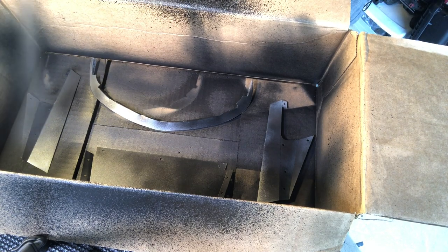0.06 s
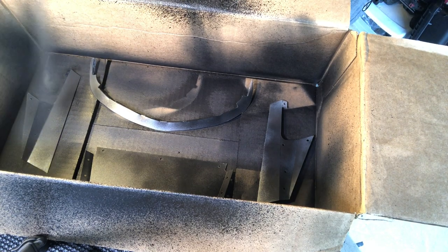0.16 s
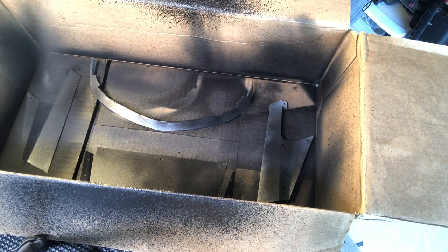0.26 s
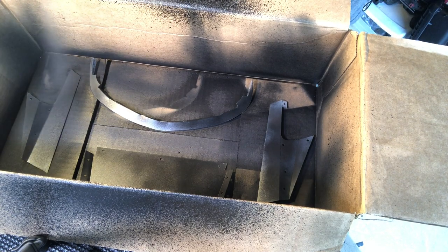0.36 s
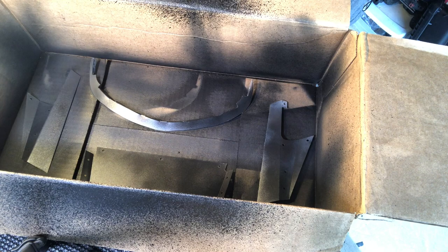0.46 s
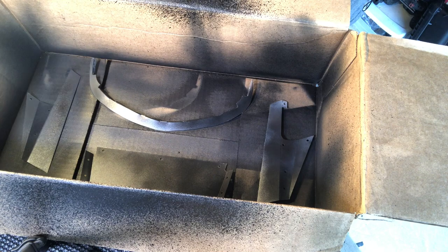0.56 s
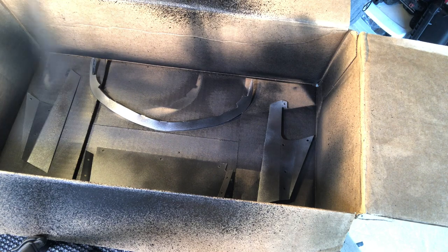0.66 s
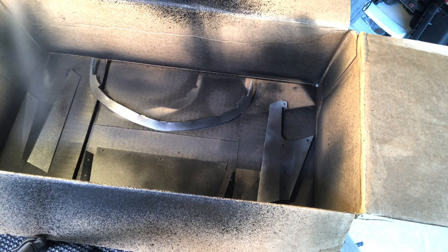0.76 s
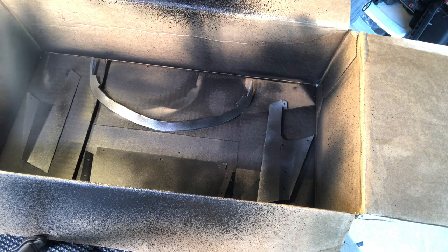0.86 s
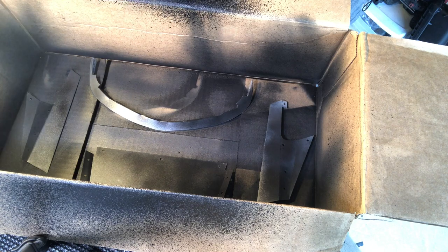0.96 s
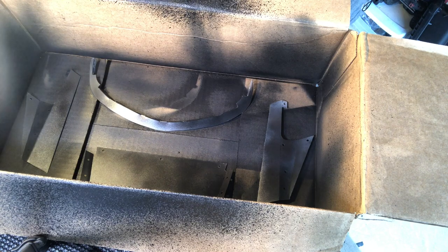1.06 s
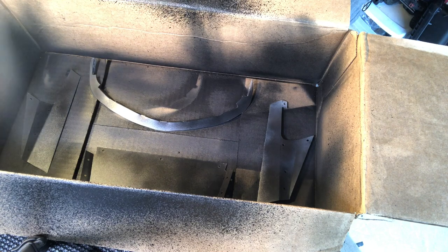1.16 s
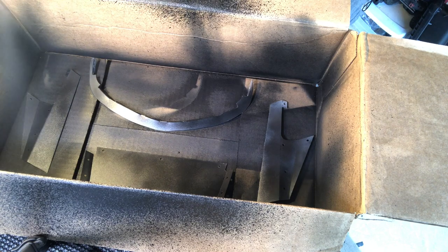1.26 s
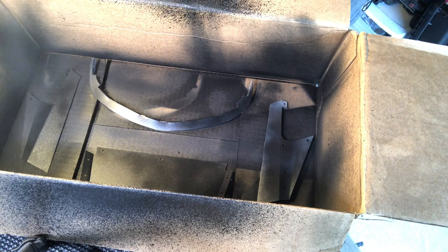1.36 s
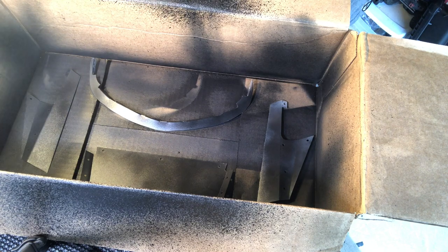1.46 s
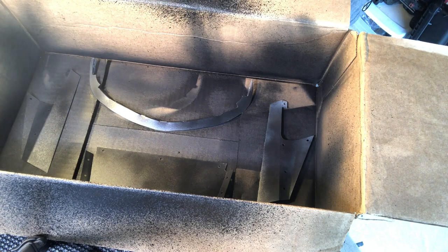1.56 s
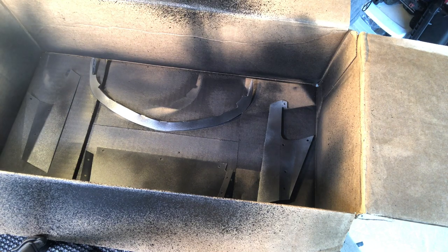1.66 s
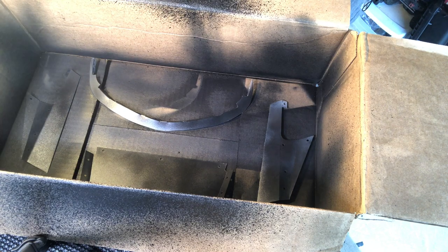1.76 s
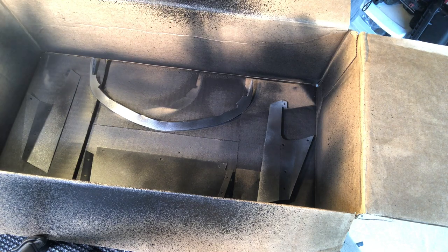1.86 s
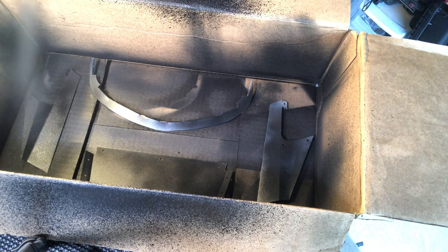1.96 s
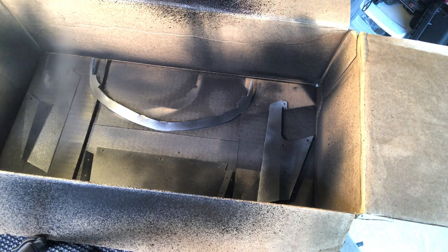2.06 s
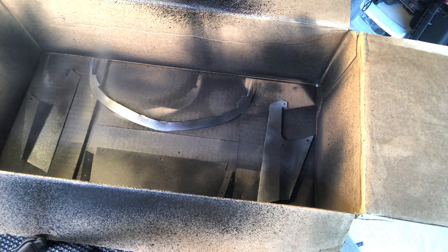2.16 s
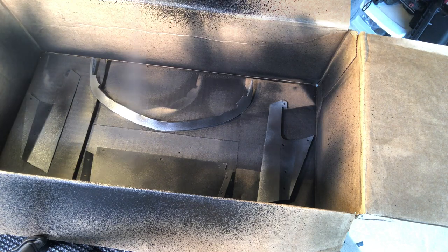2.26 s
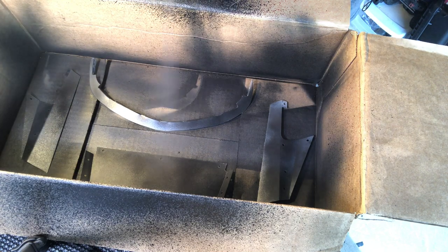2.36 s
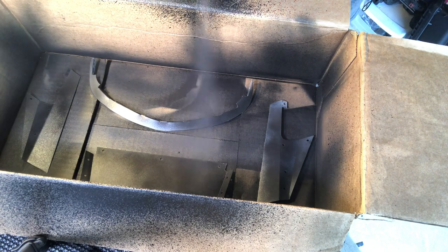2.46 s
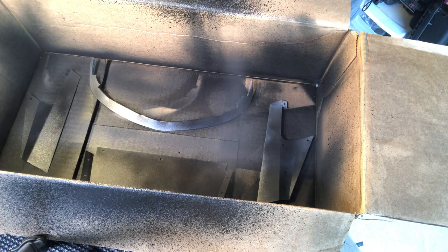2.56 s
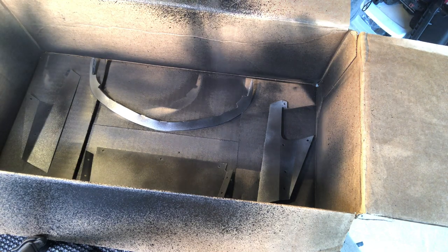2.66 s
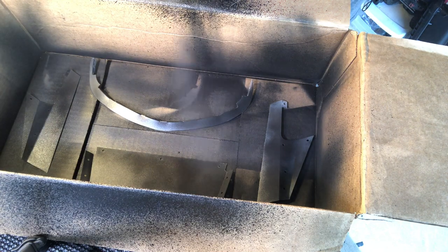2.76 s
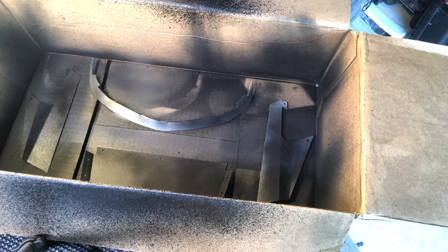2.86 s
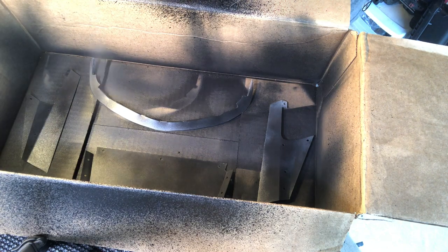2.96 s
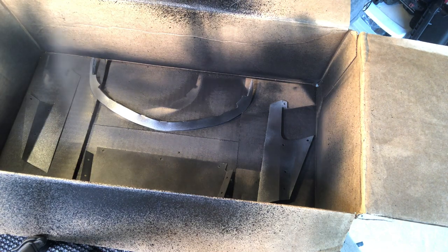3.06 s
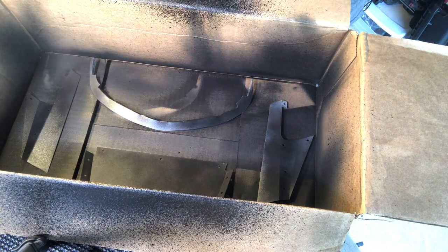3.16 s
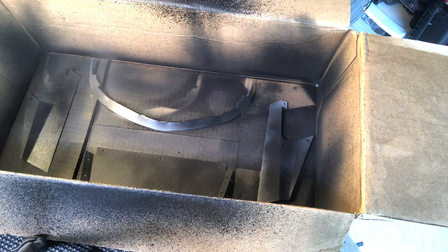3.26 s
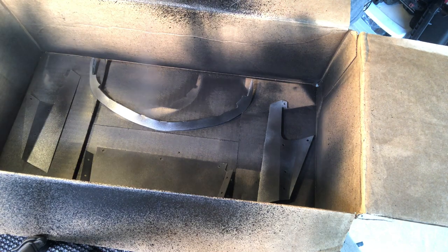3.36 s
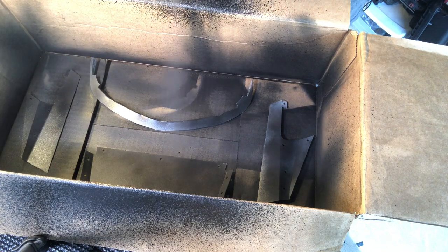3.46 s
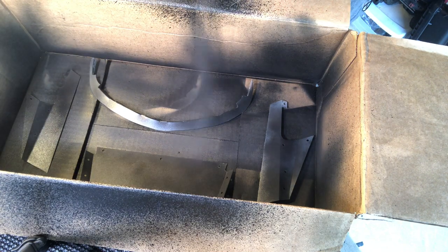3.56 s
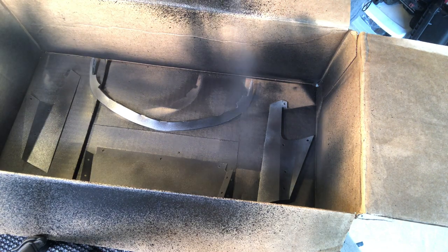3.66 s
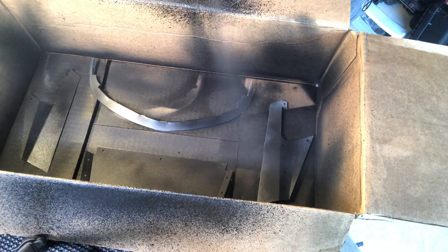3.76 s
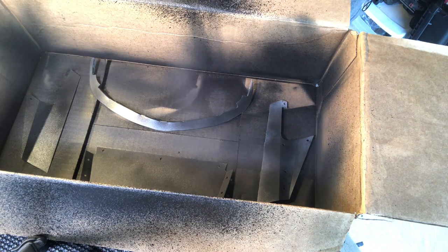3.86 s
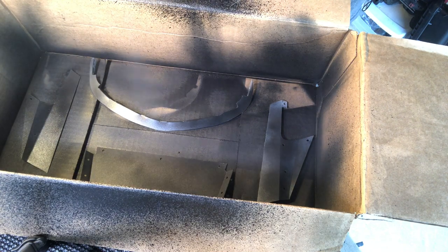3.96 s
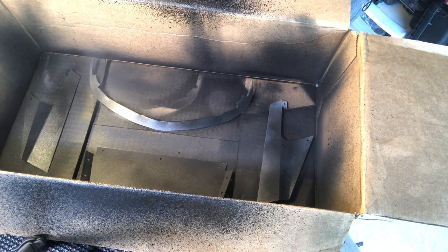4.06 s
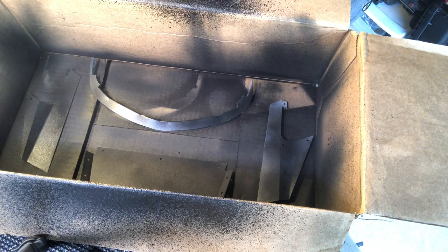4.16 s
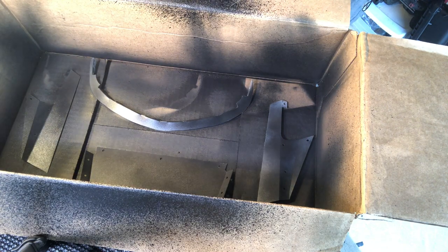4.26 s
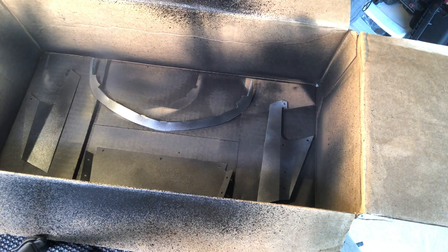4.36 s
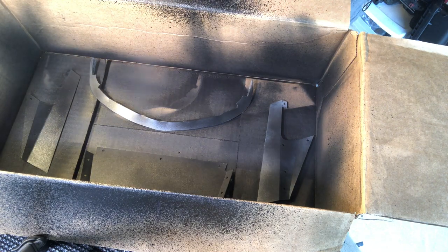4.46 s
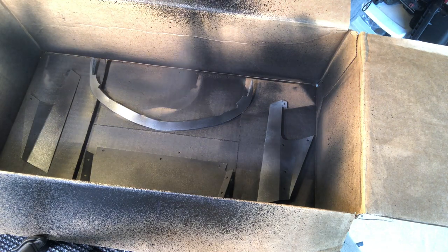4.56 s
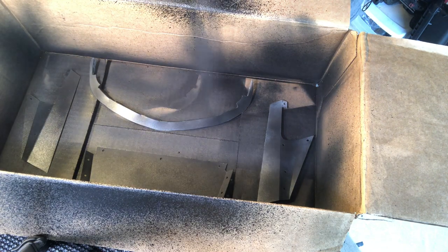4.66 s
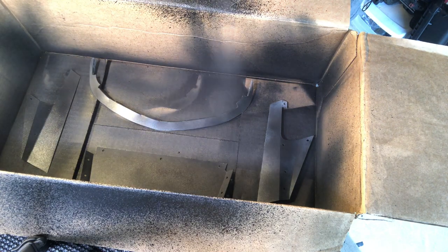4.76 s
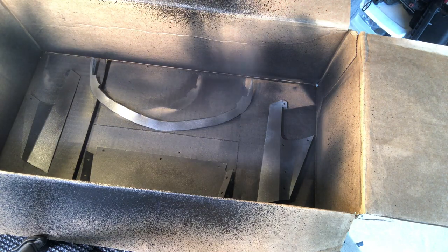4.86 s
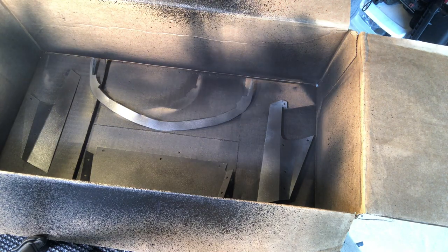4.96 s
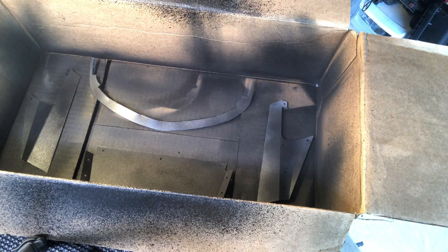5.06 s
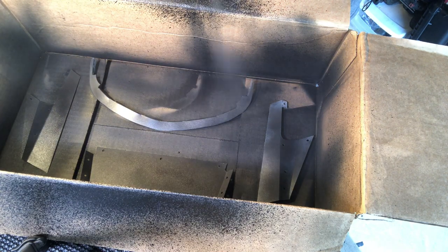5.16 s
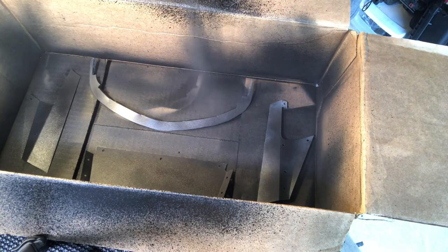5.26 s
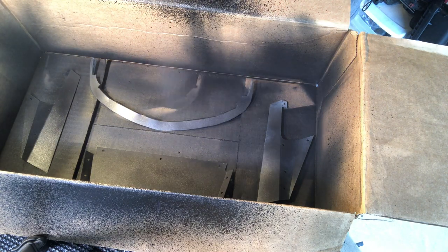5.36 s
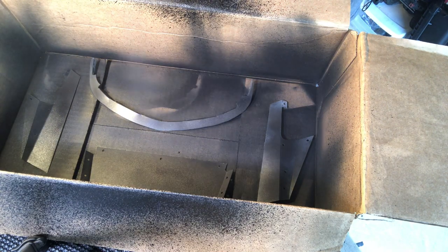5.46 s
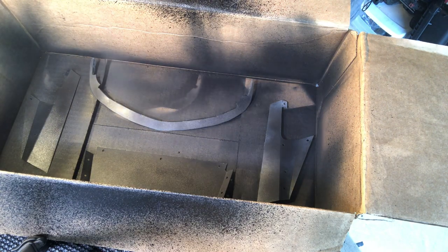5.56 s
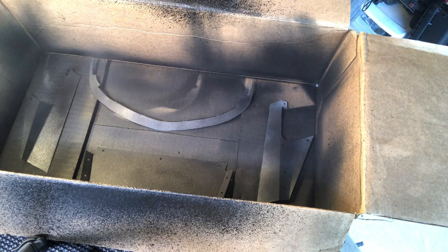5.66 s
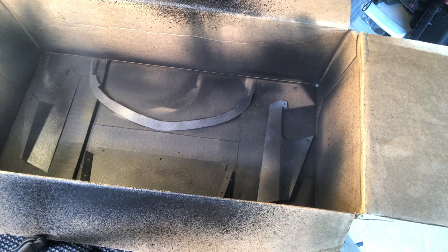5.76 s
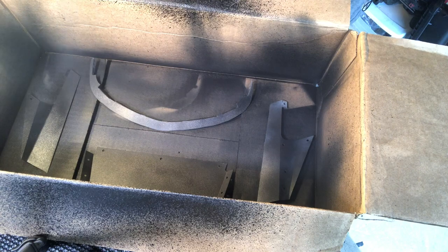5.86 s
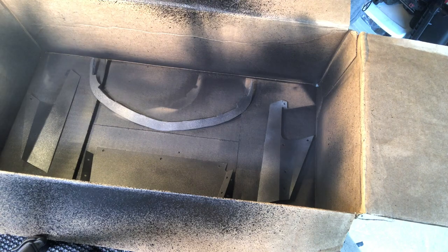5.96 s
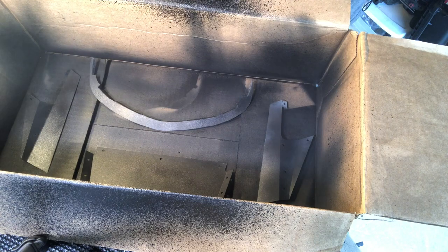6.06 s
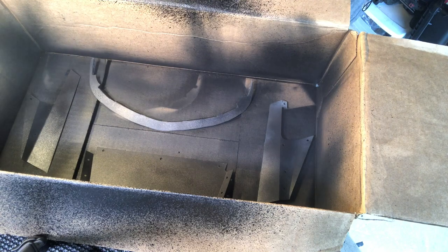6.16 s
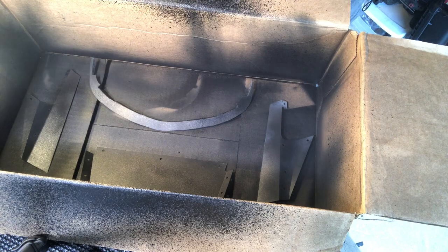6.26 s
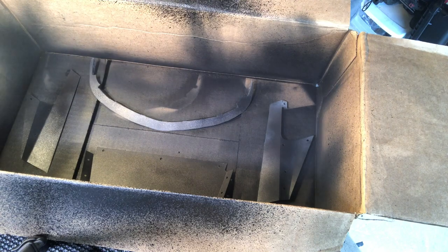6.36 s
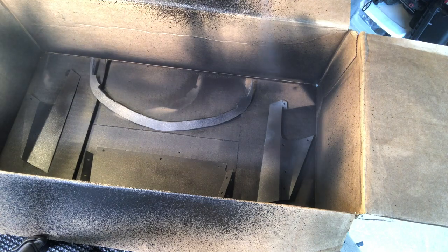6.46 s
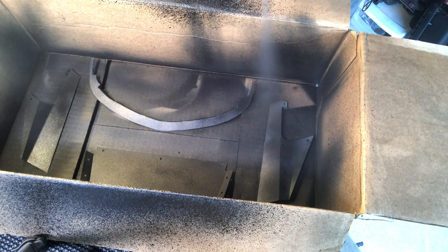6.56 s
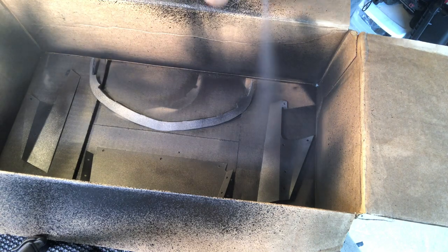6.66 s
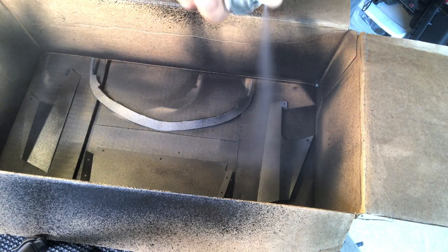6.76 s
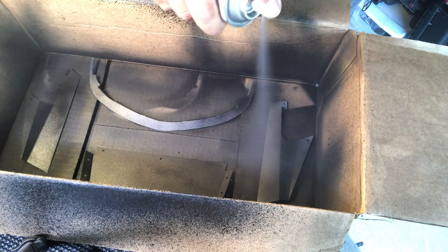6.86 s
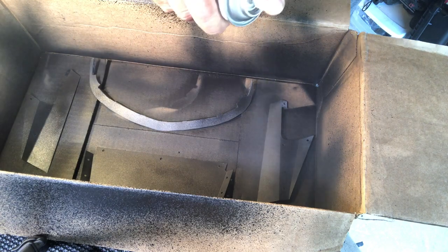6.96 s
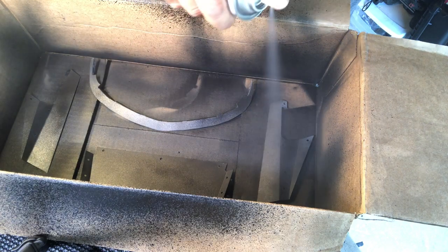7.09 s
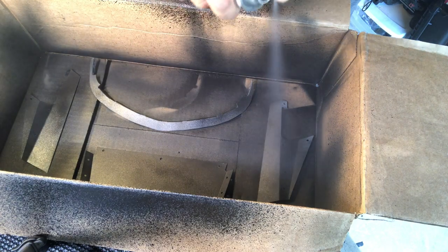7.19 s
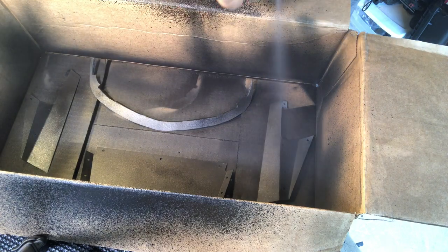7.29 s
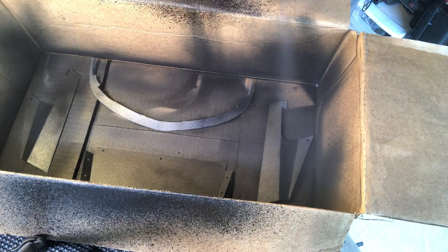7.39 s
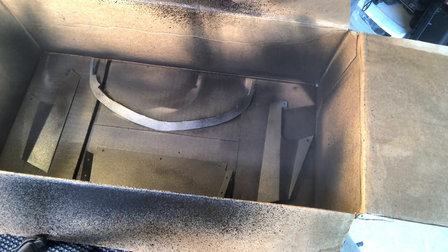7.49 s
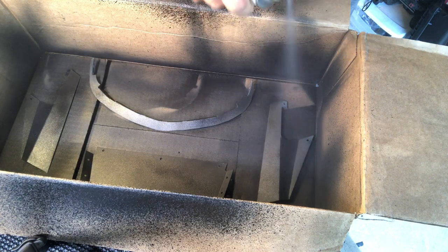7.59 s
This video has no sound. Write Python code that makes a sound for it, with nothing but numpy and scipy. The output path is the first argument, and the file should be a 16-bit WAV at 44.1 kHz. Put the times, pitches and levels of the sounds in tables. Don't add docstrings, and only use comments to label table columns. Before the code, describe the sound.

A spray paint can hisses in short, bright bursts close by inside a cardboard box, with valve ticks, ball knocks and faint distant birds.

```python
import sys
import numpy as np
from scipy import signal
from scipy.io import wavfile
from scipy.ndimage import uniform_filter1d

SR = 44100
rng = np.random.default_rng(int(sys.argv[2]) if len(sys.argv) > 2 else 0)


def magnitude_from_level(level_db):
    exponent = np.asarray(level_db, float) / 20
    return 10 ** exponent


def store_wav(level_fs):
    pcm = np.round(np.clip(np.atleast_2d(level_fs), -1, 1) * 32767)
    wavfile.write(sys.argv[1], SR, pcm.T.astype(np.int16))


N = 336483


def evened(x):
    return x / np.sqrt(np.mean(x ** 2) + 1e-20)


def read(points, hz):
    f, value = np.transpose(points)
    return np.interp(np.log(hz + 1), np.log(f + 1), value)


def add(mix, s, sound):
    part = mix[round(s * SR):][:len(sound)]
    part += sound[:len(part)]


def resonate(x, hz, width):
    turn = np.exp(2j * np.pi * np.cumsum(hz * np.ones(len(x))) / SR)
    r = np.exp(-np.pi * width / SR)
    return 2 * (turn * signal.lfilter([1 - r], [1, -r], x / turn)).real


def wobble(ms):
    span = max(int(ms * SR / 1000), 2)
    smooth = uniform_filter1d(rng.standard_normal(N), span)
    return evened(uniform_filter1d(smooth, span))


def drifting_patches(shape, bins, frames):
    across_pitch = uniform_filter1d(rng.standard_normal(shape), bins, axis=0)
    return evened(uniform_filter1d(across_pitch, frames, axis=1))


def tail(x, t60, dull_hz):
    t = np.arange(SR // 2) / SR
    dulling = np.exp(-2 * np.pi * dull_hz / SR)
    taps = signal.lfilter([1], [1, -dulling], rng.standard_normal(len(t)))
    taps *= magnitude_from_level(-60 * t / t60) * (t > .003)
    return signal.fftconvolve(x, taps / np.linalg.norm(taps))[:N]


# pitch in Hz, level in dB per Hz.
AIR_COLOUR = [(15, -49), (25, 0.5), (211, -6), (622, -8), (712, -9.5), (815, -14), (1100, -11), (3700, -22),
              (4350, -24), (5400, -23), (6520, -29), (7670, -24), (9260, -33), (13200, -30), (15900, -32)]
# pitch in Hz, width in Hz, level in dB.
HUM_LINES = [(120.7, 16, -68.5), (270.8, 30, -70.5), (67, 20, -69)]
# time in seconds, change in level in dB.
TRAFFIC_SWELL = [
    (0, -0.5),
    (1.0, -1.5),
    (1.8, -3),
    (2.5, -2),
    (3.5, 4.5),
    (4.5, 0),
    (5.5, -0.3),
    (6.5, 1.2),
    (7.63, -1),
]


def air():
    hz, t, z = signal.stft(rng.standard_normal(N), SR, nperseg=2048)
    patches_db = 2.9 * drifting_patches(z.shape, 8, 6)
    s, db = np.transpose(TRAFFIC_SWELL)
    swell_db = np.outer(1 / (1 + (hz / 500) ** 4), np.interp(t, s, db))
    colour_db = read(AIR_COLOUR, hz)[:, None] + patches_db + swell_db
    wash = signal.istft(z * magnitude_from_level(colour_db), SR, nperseg=2048)[1][:N]
    hum = sum(magnitude_from_level(db) * evened(resonate(rng.standard_normal(N), f, w)) for f, w, db in HUM_LINES)
    return magnitude_from_level(-64.5) * evened(wash) + hum


# start pitch in Hz, end pitch in Hz, share of the length spent rising.
WHISTLE_KINDS = [
    (1705, 2270, .98),
    (2945, 3455, .42),
    (2300, 3215, .52),
    (1840, 2250, .69),
]
# start in seconds, length in seconds, level in dB.
WHISTLE_NOTES = [
    [(.446, 0.064, -56.5), (.88, .075, -58), (1.524, .07, -59.5)],
    [(.531, 0.047, -53.5), (.95, 0.035, -55), (1.391, 0.054, -58), (1.607, 0.047, -57.5)],
    [(4.996, 0.04, -62), (5.971, 0.033, -52), (6.113, 0.029, -53), (6.255, 0.031, -50.5), (6.4, 0.021, -50)],
    [(6.078, .024, -59), (6.222, 0.024, -59), (6.365, .025, -61)],
]
# time in seconds, pitch in Hz, level in dB.
HOARSE_CALLS = [
    [(3.105, 1660, -68), (3.14, 1640, -60), (3.18, 1640, -70)],
    [(6.09, 1590, -69), (6.14, 1600, -72), (6.18, 1610, -67), (6.23, 1600, -71), (6.28, 1620, -67),
     (6.37, 1605, -68), (6.44, 1585, -68)],
]


def whistle(from_hz, to_hz, rise, length, db):
    u = np.linspace(0, 1, int(length * SR))
    reached = np.minimum(u / rise, 1) ** 0.99
    hz = from_hz + (to_hz - from_hz) * reached
    hz *= 1 + 0.015 * np.sin(2 * np.pi * 45 * u * length)
    loudness = magnitude_from_level(db - 3.9 * (2.5 - rise) * (1.5 - reached)) * np.hanning(len(u)) ** 0.094
    return loudness * np.sin(2 * np.pi * np.cumsum(hz) / SR)


def hoarse_call(s, hz, db):
    t = np.arange(s[0], s[-1], 1 / SR)
    pitch = np.interp(t, s, hz)
    tone = np.sqrt(2) * np.sin(2 * np.pi * np.cumsum(pitch) / SR)
    breath = resonate(resonate(rng.standard_normal(len(t)), pitch, 110), pitch, 110)
    fuzzy = evened(tone + 0.92 * evened(breath))
    return magnitude_from_level(np.interp(t, s, db)) * fuzzy * signal.windows.tukey(len(t), .2)


def birds():
    out = np.zeros(N)
    for kind, notes in zip(WHISTLE_KINDS, WHISTLE_NOTES):
        for s, length, db in notes:
            add(out, s, whistle(*kind, length, db))
    for rows in HOARSE_CALLS:
        s, hz, db = np.transpose(rows)
        add(out, s[0], hoarse_call(s, hz, db))
    return magnitude_from_level(-1.0) * out + magnitude_from_level(-1.0) * tail(out, 0.51, 6000)


# start in seconds, peak level in dB, ring pitch in Hz.
BALL_KNOCKS = [(0.2717, -48, 1330), (0.63, -48, 1410), (0.7547, -43, 1820), (0.8368, -43, 1210),
               (1.228, -44, 1340), (2.0246, -43, 1185), (3.7552, -55, 1700), (4.572, -44, 1210),
               (4.911, -45, 1270), (4.954, -50, 1200), (5.102, -44, 1355), (5.235, -46, 1210),
               (5.277, -43, 1384), (6.437, -44, 1386), (6.5234, -47, 1310), (7.3486, -42, 1440),
               (7.5606, -47, 1250)]


def knocks():
    out, t = np.zeros(N), np.arange(2000) / SR
    for s, db, hz in BALL_KNOCKS:
        wall = np.sin(2 * np.pi * hz * t) + 0.58 * np.sin(2 * np.pi * 1.32 * hz * t)
        add(out, s, magnitude_from_level(db - 0.5 - 60 * t / 0.056) * wall * np.minimum(t / 0.00071, 1))
    return out


# start in seconds, peak level in dB, ring pitch in Hz,
# treble against the ring in dB.
VALVE_TICKS = [(0.572, -40, 2040, -10), (1.3814, -49, 4100, -4), (1.3974, -54, 3250, 0),
               (1.4234, -38, 2080, -7), (1.49, -55, 1510, -11), (1.721, -45.5, 2190, -12),
               (1.811, -44.5, 2250, -24), (1.827, -52, 2300, -15), (2.5996, -54, 1820, -4),
               (4.9916, -46, 4180, -2), (5.9454, -46, 1250, -9), (6.043, -58, 11500, -6),
               (6.076, -63, 11500, -6), (6.2087, -61, 11000, -6), (7.4894, -54, 3200, -13),
               (7.509, -48, 3180, -14)]


def ticks():
    out, t = np.zeros(N), np.arange(1300) / SR
    for s, db, hz, treble_db in VALVE_TICKS:
        noise = rng.standard_normal(len(t))
        ring = evened(resonate(noise, hz, 3000)) * magnitude_from_level(-60 * t / 0.035)
        crack = np.diff(noise, prepend=0) * magnitude_from_level(treble_db - 11 - 60 * t / .02)
        add(out, s, magnitude_from_level(db - 6.5) * (ring + crack))
    return out


# start in seconds, peak level in dB, pitch in Hz.
CARDBOARD_GUSTS = [(0.632, -50, 680), (1.046, -50, 600), (1.939, -55, 455), (2.674, -52, 406),
                   (3.18, -53, 690), (4.317, -50.5, 367), (5.104, -62, 668), (5.234, -55, 657),
                   (6.439, -59, 789), (7.066, -54, 650), (7.565, -53, 686)]


def gusts():
    out, t = np.zeros(N), np.arange(3000) / SR
    for s, db, hz in CARDBOARD_GUSTS:
        noise = rng.standard_normal(len(t))
        thud = evened(resonate(resonate(noise, hz, 610), hz, 610))
        add(out, s, magnitude_from_level(db + 1 - 60 * t / 0.081) * thud * np.minimum(t / 0.0018, 1))
    return out


# start in seconds, level in dB, lower part against it in dB.
GAS_SPITS = [
    (0.614, -52.5, 2),
    (1.009, -53, -3),
    (1.927, -54.5, 4.5),
    (2.658, -51, -13),
    (3.143, -63, -2),
    (4.292, -51.5, -2.5),
    (5.081, -51, -3),
    (6.425, -54, 3),
    (7.044, -59, 2),
    (7.549, -51, -5),
]


def spits():
    out, t = np.zeros(N), np.arange(1500) / SR
    for s, db, low_db in GAS_SPITS:
        noise = rng.standard_normal(len(t))
        puff = evened(resonate(noise, 16600, 4100)) + magnitude_from_level(low_db) * evened(resonate(noise, 5200, 2700))
        add(out, s, magnitude_from_level(db + 5.5 - 60 * t / 0.056) * puff * np.minimum(t / 0.0013, 1))
    return out


# paint arrives in seconds, finger lets go in seconds.
SQUEEZE_TIMES = [(-.2, .41), (.624, .856), (1.015, 1.355), (1.93, 2.553), (2.663, 3.092), (3.158, 4.146),
                 (4.296, 4.937), (5.089, 5.908), (6.428, 6.94), (7.053, 7.415), (7.553, 7.7)]


def through_squeezes(t, rows):
    times = [np.linspace(opens, shuts, len(row)) for (opens, shuts), row in zip(SQUEEZE_TIMES, rows)]
    return np.interp(t, np.concatenate(times), np.concatenate(rows))


# rise in seconds, release in seconds, jet at first in dB,
# jet at last in dB, paint landing in the box in dB.
SQUEEZE_STROKES = [(.02, 0.057, -44, -44, -52), (0.011, .05, -45, -44.5, -51.5),
                   (0.0085, 0.035, -43.5, -44, -50.5), (0.0079, 0.03, -42.5, -44.5, -49),
                   (0.0082, 0.03, -44, -44, -49), (0.014, 0.037, -44, -44.5, -50),
                   (.012, 0.048, -42.5, -46, -51.5), (0.013, 0.028, -45, -44, -51),
                   (0.011, 0.04, -47.5, -45.5, -50), (.015, 0.054, -45, -47.5, -49),
                   (0.0084, .04, -48.5, -45, -50)]
# time in seconds, level against the open flow in dB.
VALVE_HICCUPS = [
    (1.401, -21),
    (1.428, -16.5),
    (2.603, -18),
    (3.147, -24),
    (4.191, -17),
    (4.994, -19),
    (5.948, -23),
    (6.996, -21),
]


def flow(t, lag, surge_db, fall_db, leak_db, hiccup_db):
    rise_bend, shut_bend, surge_s = 0.82, 1.35, 0.013
    hiccup_fade, leak_fade = 1500, 140
    out = sum(magnitude_from_level(db + hiccup_db - hiccup_fade * abs(t - s)) for s, db in VALVE_HICCUPS)
    for (opens, shuts), (rise, release, *_) in zip(SQUEEZE_TIMES, SQUEEZE_STROKES):
        since = np.maximum(t - opens - lag, 0)
        after = np.maximum(t - shuts, 0)
        surge = magnitude_from_level(surge_db * np.exp(-since / surge_s))
        opening = (1 - np.exp(-(since / rise) ** rise_bend)) * surge
        closing = magnitude_from_level(-fall_db * np.minimum(after / release, 10) ** shut_bend)
        leak = magnitude_from_level(leak_db - leak_fade * np.maximum(after - release, 0)) * np.minimum(after / release, 1)
        out = out + opening * (closing + leak)
    return out


# pitch in Hz, share from 0 to 1.
WALL_SHARE = [(800, 0.11), (3000, 0.17), (7000, 0.2), (10000, 0.71), (13000, 0.62), (16000, 0.35)]
# extra path by the near wall in ms, at even steps.
HAND_SWEEPS = [(1.44, 1.346, 1.24, 1.196), (1.21, 1.268, 1.365), (1.352, 1.277, 1.236),
               (1.398, 1.412, 1.46, 1.52, 1.59), (1.555, 1.481, 1.411, 1.383),
               (1.41, 1.412, 1.472, 1.54, 1.506, 1.452, 1.437), (1.444, 1.451, 1.469, 1.484),
               (1.486, 1.469, 1.429, 1.386, 1.369), (1.43, 1.427, 1.482, 1.559),
               (1.705, 1.612, 1.531, 1.49), (1.337, 1.322)]


def wall_echo(hz, t):
    near = through_squeezes(t, HAND_SWEEPS)

    def late(ms):
        return np.exp(-2j * np.pi * np.outer(hz, ms) / 1000)

    face = late(near) + 0.49 * late(near + 0.266) + 0.1 * late(near - .3) + 0.16 * late(2.1 * near - .9)
    corner_share = .3 / (1 + (hz / 7000) ** 6)
    return read(WALL_SHARE, hz)[:, None] * face + corner_share[:, None] * late(near + .22)


# pitch in Hz, level in dB per Hz.
HISS_COLOUR = [(180, -51.5), (300, -25.5), (502, -23), (583, -21), (854, -21.5), (1210, -12), (1480, -15),
               (1800, -12.5), (3120, -10), (3390, -7.5), (6270, -10.5), (7660, -6.5), (9190, -6.5),
               (13200, 15), (15900, -1)]
# pitch in Hz, width in Hz, boost in dB.
BOX_MODES = [(1068, 45, 12), (1210, 64, 0.5), (570, 68, 8.5), (2850, 150, 0.5), (4020, 360, 1.5),
             (4690, 1100, 2), (7850, 1400, 3), (9100, 290, -1.5), (12300, 2500, 0.5), (14640, 700, 6.5)]
# fizz tilt at first in dB, fizz tilt at last in dB,
# jet tilt at first in dB, jet tilt at last in dB.
NOZZLE_AIM = [(-2.5, 2.5, 1.5, -1.5), (0, -1.5, 4.5, -0.5), (-2, -1, 3.5, 2), (-2.5, -2.2, 2.5, -0.5),
              (-3, 0, -1.5, 3), (-0.4, -1.3, -0.2, -0.1), (-1, -1.7, 0.2, 0.1), (-2, -0.5, 0, 0),
              (1.5, 2.5, 1.5, -1.5), (1.5, 5, -1, 2), (5, 8, 2, -3.5)]


def spray_colour(hz, t, shape):
    fizz_db, jet_db = (through_squeezes(t, half) for half in np.hsplit(np.array(NOZZLE_AIM), 2))
    tilt_db = np.outer(np.clip((hz - 12800) / 2500, -1, 1) * (hz > 9300), fizz_db)
    tilt_db += np.outer(np.sin(np.pi * np.clip((hz - 4100) / 2000, -1, 1)), jet_db)
    box_db = sum(db / (1 + (2 * (hz - f) / w) ** 2) for f, w, db in BOX_MODES)
    patches = drifting_patches(shape, 8, 30)
    colour_db = (read(HISS_COLOUR, hz) + box_db)[:, None] + tilt_db + 1.53 * patches
    wall_patches = magnitude_from_level(2.5 * (patches[::-1] - 1))
    return magnitude_from_level(colour_db) * (1 + wall_patches * wall_echo(hz, t))


# level in dB, at even steps.
FIZZ_LEVELS = [(-36, -36, -37, -35), (-37, -36, -39), (-39, -40, -37), (-41, -38, -37.5, -38, -35.5),
               (-37.5, -37.5, -36.5, -36.5), (-36, -37, -36, -36.5, -36, -35.5, -38.5),
               (-36.5, -38, -37, -39), (-37.5, -39, -36.5, -37.5, -37.5), (-40, -37, -34.5, -37.5),
               (-36.5, -37, -36.5, -36.5), (-34.5, -42)]
# lag in seconds, first surge in dB, fall over the release in dB,
# leak after it in dB, share of the fizz swings from 0 to 1.
SPRAY_LAYERS = [
    (0, -4, 32, -32, 1),
    (0.001, 3.5, 24, -24, .25),
    (.006, 7, 25, -17, .2),
]


def spray():
    splutter = magnitude_from_level(0.97 * wobble(0.42) + 0.63 * wobble(3.3) + 0.27 * wobble(30))
    hz, t, z = signal.stft(rng.standard_normal(N) * splutter, SR, nperseg=512, noverlap=384)
    colour = spray_colour(hz, t, z.shape)
    above_box = 1 / (1 + (3600 / (hz + 1)) ** 6)
    above_jet = 1 / (1 + (9300 / (hz + 1)) ** 12)
    shares = [above_jet, above_box - above_jet, 1 - above_box]

    clock, out = np.arange(N) / SR, np.zeros(N)
    usual_fizz_db = -36
    swing_db = through_squeezes(clock, FIZZ_LEVELS) - usual_fizz_db
    jet_db = through_squeezes(clock, [row[2:4] for row in SQUEEZE_STROKES])
    paint_db = through_squeezes(clock, [row[4:] * 2 for row in SQUEEZE_STROKES])
    levels_db = [usual_fizz_db, jet_db, paint_db]
    hiccups_db = [0, 4, 4]
    for share, level_db, hiccup_db, layer in zip(shares, levels_db, hiccups_db, SPRAY_LAYERS):
        lag, surge_db, fall_db, leak_db, follows = layer
        part = colour * share[:, None]
        part = part / np.linalg.norm(part, axis=0)
        hiss = evened(signal.istft(z * part, SR, nperseg=512, noverlap=384)[1][:N])
        valve = flow(clock, lag, surge_db, fall_db, leak_db, hiccup_db)
        out += hiss * valve * magnitude_from_level(level_db + follows * swing_db)
    return out


def scene():
    near = spray() + ticks() + knocks() + spits() + gusts()
    mono = near + magnitude_from_level(-14) * tail(near, 0.065, 7000) + birds() + air()
    return np.array([mono, mono])


def roll_off(x):
    return signal.sosfilt(signal.butter(12, 17020, fs=SR, output="sos"), x)


def record(dry):
    treble_cut = signal.firwin(511, 15950, window=("kaiser", 9), fs=SR)
    limited = signal.oaconvolve(dry, treble_cut[None], "same")
    wind_cut = signal.butter(N=2, Wn=55, btype="high", fs=SR, output="sos")
    return roll_off(signal.sosfilt(wind_cut, limited))


dry = scene()
out = record(dry)
store_wav(out)
```